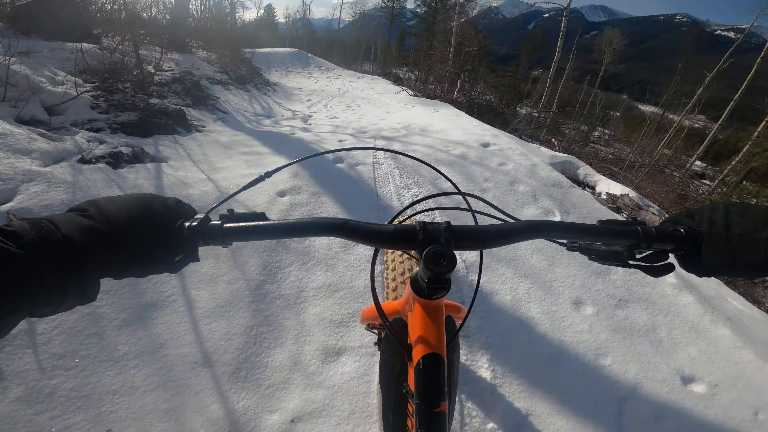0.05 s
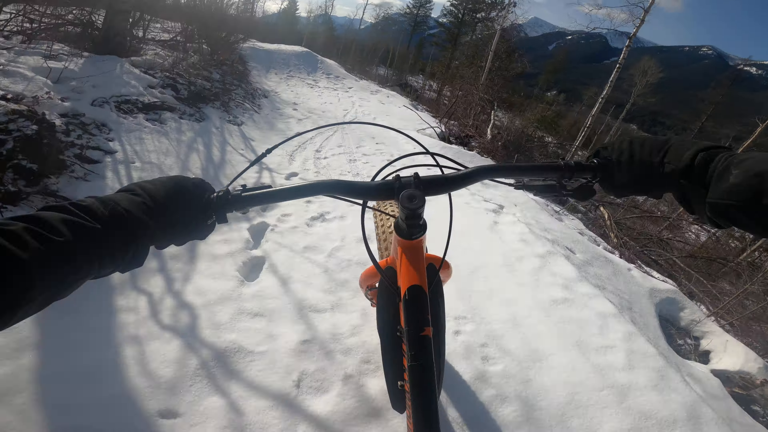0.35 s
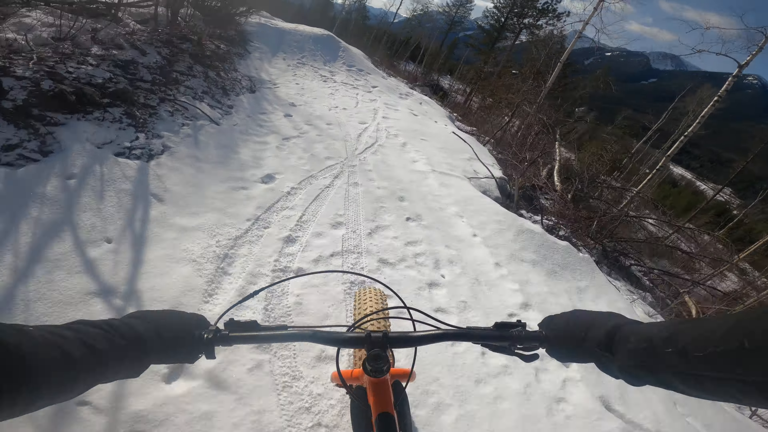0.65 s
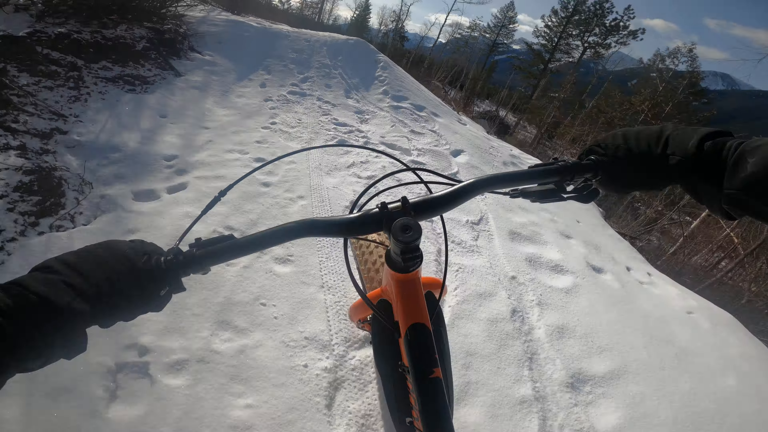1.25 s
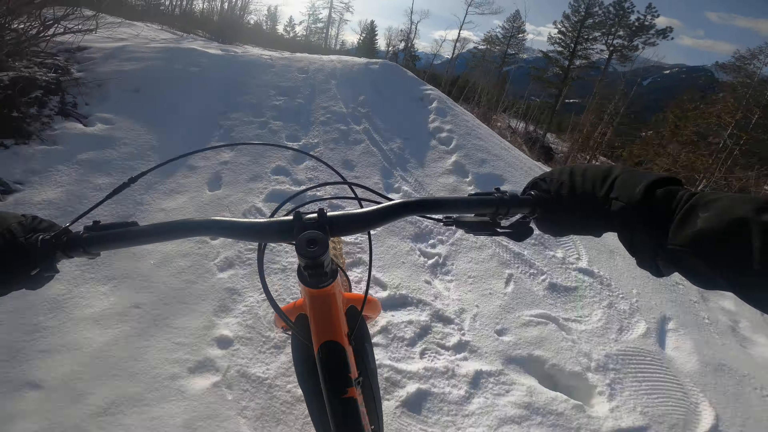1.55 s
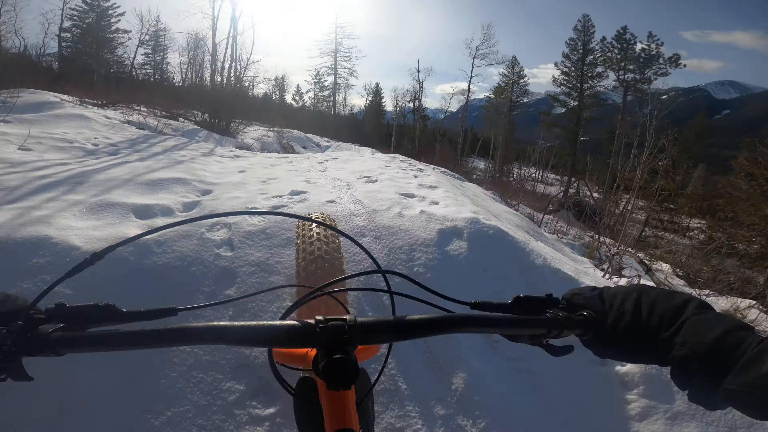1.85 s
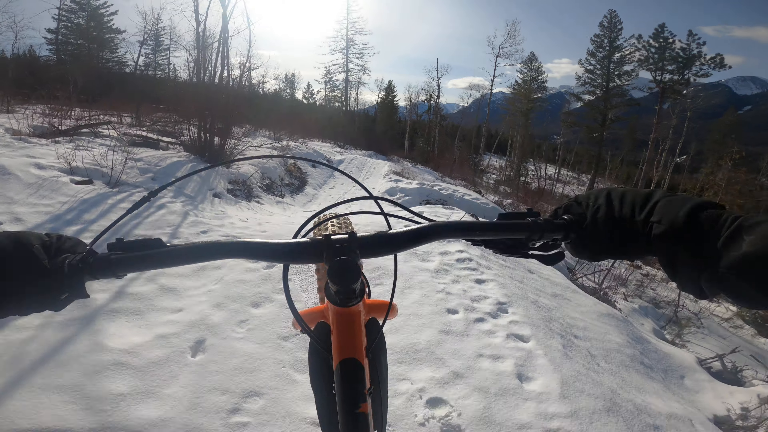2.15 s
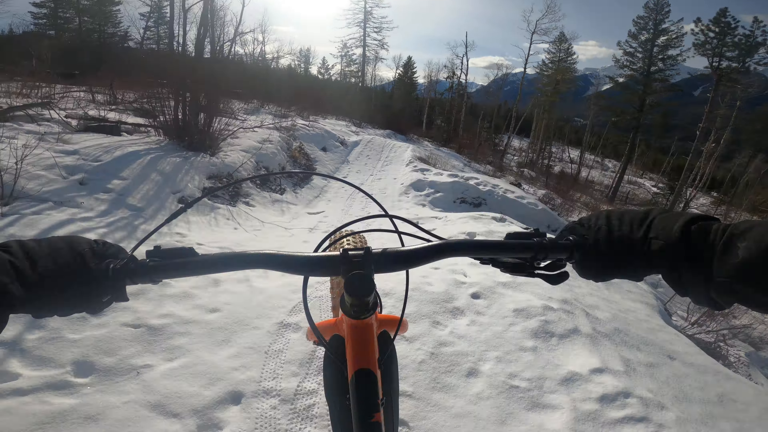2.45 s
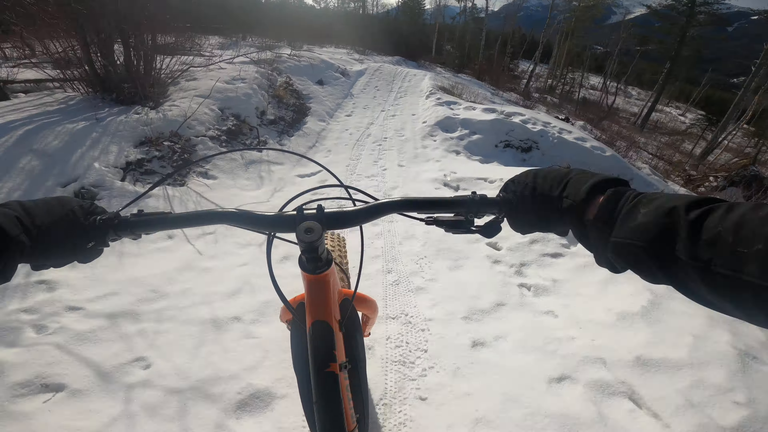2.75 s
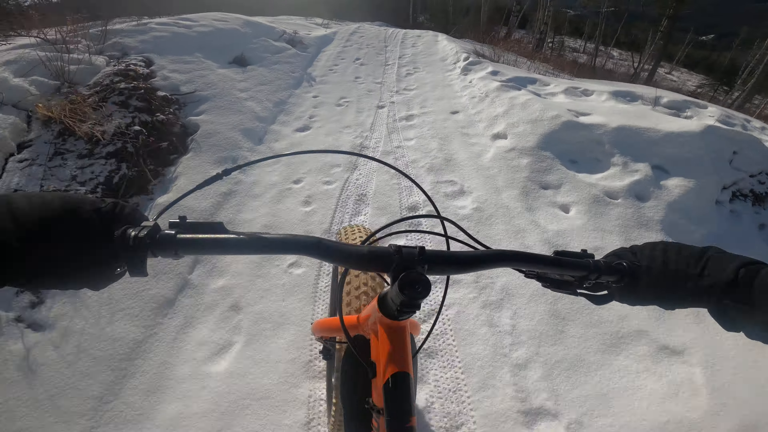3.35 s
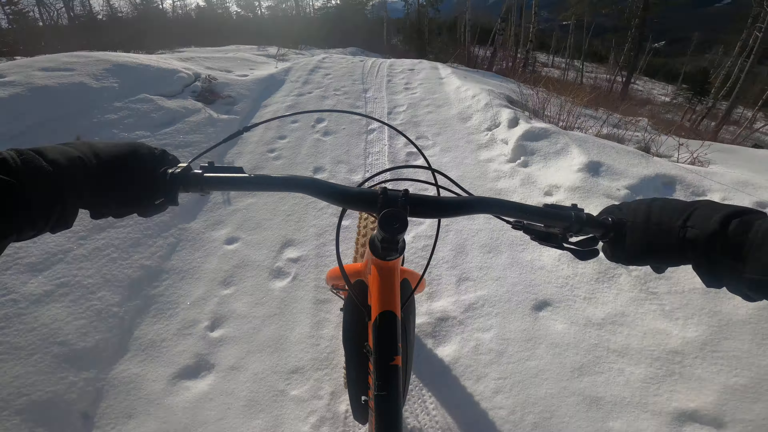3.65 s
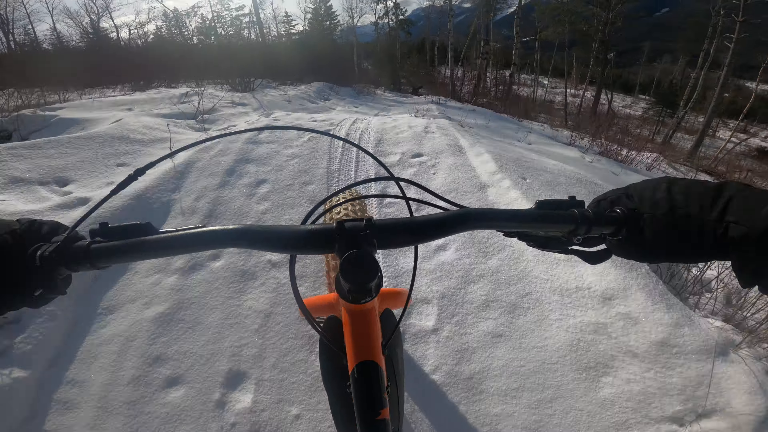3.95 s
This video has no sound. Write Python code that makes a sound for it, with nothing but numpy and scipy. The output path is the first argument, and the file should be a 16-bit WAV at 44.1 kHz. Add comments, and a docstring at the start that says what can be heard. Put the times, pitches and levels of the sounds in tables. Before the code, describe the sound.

Mountain bike tyres drum and crunch over packed snow while wind buffets the rider's chest microphone. The tyres briefly go quiet twice, the second time leaving a ticking freewheel, before a thudding landing, chain rattle and more bumpy rolling.

```python
"""Knobby mountain bike tyres coast over packed snow, heard from the rider's chest. The tread drums
through the frame, crunches the crust and squeaks as it slips. The tyres go quiet over a roller and
again in a jump, where the ticking freewheel comes through. Both wheels land with a thud that jolts
the microphone, the chain slaps the frame, and a headwind buffets throughout."""
import sys
import numpy as np
from scipy.fft import rfft, irfft, next_fast_len
from scipy.io import wavfile
from scipy.ndimage import uniform_filter1d, map_coordinates

SR = 44100
rng = np.random.default_rng(int(sys.argv[2]) if len(sys.argv) > 2 else 0)


def file_out(sig):
    """Save sig as 16-bit WAV at sys.argv[1]."""
    # one column per channel
    cols = np.atleast_2d(sig).T
    # limit, then scale
    lim = np.clip(cols, -1, 1)
    pcm = np.round(lim * 32767).astype(np.int16)
    wavfile.write(sys.argv[1], SR, pcm)


N = 176400


def amp(db):
    """Decibels to gain."""
    return 10 ** (np.asarray(db) / 20)


def unit(x):
    """Scale to rms 1."""
    return x / np.sqrt(np.mean(x ** 2) + 1e-20)


def curve(rows):
    """An automation line through (seconds, value) points, one value per sample."""
    return np.interp(np.arange(N) / SR, *np.transpose(rows))


def wobble(per_s):
    """A smooth random curve through per_s points a second."""
    return map_coordinates(rng.standard_normal(4096), [np.arange(N) * per_s / SR], mode="wrap")


def coloured(x, eq):
    """Shape x with a causal, unit-power EQ drawn through (Hz, dB) points."""
    size = next_fast_len(N + SR // 4, True) // 2 * 2
    hz, db = np.transpose(eq)
    gain = amp(np.interp(np.log(np.fft.rfftfreq(size, 1 / SR) + 1), np.log(hz), db))
    # Minimum phase, so nothing rings ahead of a hit.
    cepstrum = irfft(np.log(unit(gain)), size)
    cepstrum[1:size // 2] *= 2
    cepstrum[size // 2 + 1:] = 0
    return irfft(rfft(x, size) * np.exp(rfft(cepstrum)), size)[:N]


def contacts(per_s, spread_db):
    """Randomly timed impulses of scattered size, rms 1."""
    impulses = (rng.random(N) < per_s / SR) * rng.choice([-1, 1], N)
    return unit(impulses * amp(spread_db * rng.standard_normal(N)))


def steady(x, samples):
    """Level out the chance swells of a noise over a window of samples."""
    power = uniform_filter1d(uniform_filter1d(x ** 2, samples), samples)
    return x / np.sqrt(np.abs(power) + 1e-12)


def add(track, start, sound):
    """Mix a sound into the track at start seconds."""
    part = track[max(0, round(start * SR)):][:len(sound)]
    part += sound[:len(part)]


# The fader for drum and crunch together. Each row: time in seconds, level in dB.
ROLL_LEVEL = [(0, -24.5), (.34, -23.5), (.42, -26.5), (.45, -33), (.77, -45.5), (.795, -27.5), (.93, -27),
              (1.0, -29), (1.11, -23.5), (1.42, -28), (1.48, -25), (1.55, -28.5), (1.6, -26), (1.87, -20),
              (2.03, -24.5), (2.12, -37.5), (2.17, -30), (2.24, -41.5), (2.595, -54), (2.64, -27.5),
              (2.72, -20.5), (2.82, -28.5), (3.0, -34), (3.3, -30.5), (3.43, -24), (3.62, -23), (3.72, -29),
              (4, -27)]
# How crisp the snow is. Each row: time in seconds, crunch trim in dB.
CRISPNESS = [(.3, -13), (.95, -8), (1.4, -12), (1.85, -13), (2.2, -11.5), (3.8, -14.5)]
# The hollow body of casing and frame. Each row: frequency in Hz, gain in dB.
DRUM_EQ = [(40, -17.5), (120, -10), (200, -11.5), (270, 1), (320, 0.5), (400, -2.5), (600, -7.5),
           (800, -12), (1200, -14), (1550, -22.5), (2500, -33), (15000, -105)]
# The midrange bite of breaking snow crystals. Each row: frequency in Hz, gain in dB.
CRUNCH_EQ = [(300, -13.5), (900, 6), (1500, 3.5), (2200, 1.5), (2650, -1), (3300, -2), (4200, -8.5),
             (5600, -12), (7500, -22.5), (11800, -35), (15000, -63)]

def tyres():
    """Tread blocks drum on the casing and frame while snow crystals break; bumps shake both."""
    bumps_db = 1.4 * wobble(70)
    drum = steady(coloured(contacts(per_s=1600, spread_db=1), DRUM_EQ), samples=1000)
    crunch = unit(coloured(contacts(per_s=5400, spread_db=2.5), CRUNCH_EQ))
    crunch_db = curve(CRISPNESS) + .99 * wobble(120)
    return amp(curve(ROLL_LEVEL) + bumps_db) * (amp(1) * drum + amp(crunch_db) * crunch)


# Wheels hitting the ground, a rut or a footprint. Each row: start in seconds, strength in dB.
THUDS = [(0.778, -36), (0.883, -20.5), (1.122, -23), (1.248, -24), (1.305, -17.5), (1.375, -20),
         (1.475, -21), (1.606, -16.5), (1.733, -20.5), (1.87, -24), (2.604, -13), (2.664, -12),
         (2.755, -20), (2.838, -21.5), (2.92, -20.5), (3.169, -25.5), (3.227, -20.5), (3.407, -17),
         (3.51, -18.5), (3.631, -19.5), (3.913, -21)]
# The boxy knock of the bike. Each row: frequency in Hz, gain in dB.
THUD_EQ = [(40, 0.5), (150, -12), (320, 9), (480, 3.5), (700, -1.5), (1000, -9), (1300, -7.5), (1700, -16),
           (3000, -23), (6000, -39.5), (14000, -64.5)]

def wheel_thuds(attack_s=.004, t60=.1, kick_db=14, crumble_db=3):
    """A wheel slams into the snow: one kick, then a burst of collapsing crust, through the bike."""
    envelope, kicks = np.zeros((2, N))
    t = np.arange(SR // 4) / SR
    for start, db in THUDS:
        add(envelope, start, amp(db - 60 * t / t60) * (1 - np.exp(-t / attack_s)))
        kicks[round(start * SR)] = amp(db + kick_db)
    crumble = steady(coloured(contacts(per_s=4000, spread_db=2), THUD_EQ), samples=300)
    return amp(crumble_db) * envelope * crumble + coloured(kicks, THUD_EQ)


# Rubber chirps. Each row: start in seconds, length in seconds, level in dB, pitch in Hz.
SQUEAKS = [(1.1, .075, -36, 2170), (1.335, .035, -38, 2150), (1.368, .02, -29, 2250)]

def squeaks(slips_per_s=900, roughness=.055):
    """The tread slips on the snow in brief, hoarse squeaks."""
    out, t = np.zeros(N), np.arange(N) / SR
    for start, length, db, hz in SQUEAKS:
        cycles = np.cumsum(hz * (1 + roughness * wobble(slips_per_s))) / SR
        progress = np.clip((t - start) / length, 0, 1)
        swell = np.sqrt(np.abs(np.sin(np.pi * progress)))
        out += swell * amp(db + 2 * wobble(slips_per_s / 2)) * np.sin(2 * np.pi * cycles)
    return out


# The fader for the buffeting. Each row: time in seconds, level in dB before the boost.
BUFFET_LEVEL = [(0, -26), (.42, -20.5), (.78, -24), (1.02, -26), (1.2, -22), (1.6, -26), (2.03, -25),
                (2.17, -35), (2.32, -35), (2.45, -27), (2.62, -31), (2.69, -27.5), (2.92, -31),
                (3.1, -28.5), (3.26, -34.5), (3.43, -26.5), (3.78, -25), (4, -30.5)]
# The low rumble of wind on the microphone. Each row: frequency in Hz, gain in dB.
BUFFET_EQ = [(20, 0), (60, 0), (170, -4.5), (240, -10), (400, -16.5), (800, -34.5), (2000, -51),
             (15000, -115)]

def headwind(boost_db=3):
    """Wind buffets the microphone with a broad rumble."""
    rumble = steady(coloured(rng.standard_normal(N), BUFFET_EQ), samples=3000)
    return amp(curve(BUFFET_LEVEL) + boost_db) * rumble


# Deep flutters on the microphone: wind gusts, plus the low jolt of the landing at 2.655 s.
# Each row: start in seconds, length in seconds, level in dB, pitch in Hz.
FLUTTERS = [(0.429, .29, -19.5, 98), (1.2, 0.27, -19, 66), (2.406, 0.21, -18.5, 52.3),
            (2.655, 0.059, -18, 44.8), (3.676, 0.104, -14, 50)]

def deep_flutters(pitch_spread=.146, fade_s=.025):
    """Eddies in the wind, and once the landing, shake the microphone with a low, wavering tone."""
    out, t = np.zeros(N), np.arange(N) / SR
    for start, length, db, hz in FLUTTERS:
        cycles = np.cumsum(hz * (1 + pitch_spread * wobble(hz))) / SR
        swell = np.clip(np.minimum(t - start, start + length - t) / fade_s, 0, 1)
        out += swell * amp(db + 2 * wobble(36)) * np.sin(2 * np.pi * cycles)
    return out


# The bright snap of bare metal contact. Each row: frequency in Hz, gain in dB.
CLICK_EQ = [(500, -12), (2000, -8), (3500, 7), (6000, 4.5), (8500, -8), (12000, -19.5), (15000, -26)]

def struck_metal(hits, modes, t60, attack_s, click_db, click_t60, ring_growth=0):
    """Each (seconds, dB) hit clicks and rings a little differently; ring_growth dulls soft hits."""
    ring, click = np.zeros((2, N))
    t = np.arange(SR // 12) / SR
    hz, mode_db = np.transpose(modes)[:, :, None]
    attack = 1 - np.exp(-t / attack_s)
    hardest_db = max(db for _, db in hits)
    for start, db in hits:
        scatter, detune, phase = rng.standard_normal((3, len(modes), 1))
        decays = amp(mode_db + 2.5 * scatter - 60 * t / t60)
        partials = decays * np.sin(2 * np.pi * (hz * (1 + .016 * detune) * t + phase))
        add(ring, start, amp(db + ring_growth * (db - hardest_db)) * attack * partials.sum(0))
        burst = attack * rng.standard_normal(len(t))
        add(click, start, amp(db + click_db - 60 * t / click_t60) * burst)
    return ring + coloured(click, CLICK_EQ)


# The pace of the coasting hub. Each row: time in seconds, ticks per second.
TICK_RATE = [(0, 48), (.6, 61), (.8, 72), (2.0, 42), (2.1, 44), (2.14, 37.5), (2.26, 35.7), (2.38, 39.5),
             (2.42, 50), (2.55, 59), (2.85, 36), (3.8, 56)]
# How hard the pawls drop. Each row: time in seconds, strength in dB.
TICK_STRENGTH = [(0, -36.5), (.55, -45), (2.08, -41), (2.14, -50), (2.24, -42), (2.44, -34.5), (2.55, -39),
                 (2.85, -31.5), (3.1, -55), (3.8, -43.5)]
# The thin ring of the hub. Each row: frequency in Hz, relative level in dB.
HUB_MODES = [(4120, -7.5), (4700, -11), (5620, -7), (9350, -19), (9870, -21)]

def freewheel(anchor_s=2.2245):
    """Pawls drop over each tooth of the rear hub; one tick is at anchor_s, the pace sets the rest."""
    teeth = np.cumsum(curve(TICK_RATE)) / SR
    drops = np.flatnonzero(np.diff(np.floor(teeth - teeth[round(anchor_s * SR)])))
    tick_db = curve(TICK_STRENGTH)[drops] + 1.6 * rng.standard_normal(len(drops))
    ticks = list(zip(drops / SR, tick_db))
    return struck_metal(ticks, HUB_MODES, t60=.03, attack_s=.0026, click_db=-3, click_t60=.032)


# Chain and cable slaps. Each row: start in seconds, strength in dB.
SLAPS = [(.228, -35), (.961, -35), (2.714, -26.5), (2.739, -23.5), (2.862, -34), (2.985, -35.5),
         (3.246, -32), (3.48, -33.5), (3.69, -36)]
# The clink of the chain. Each row: frequency in Hz, relative level in dB.
CHAIN_MODES = [(2724, -6), (3208, -5), (3505, 2), (3801, -3), (4883, -8), (6304, -10)]

def chain():
    """The chain and cables slap the frame over bumps; the hardest slaps ring most."""
    return struck_metal(SLAPS, CHAIN_MODES, t60=.036, attack_s=.0005,
                        click_db=-1, click_t60=.024, ring_growth=.45)


# The soft rush of air around the tread. Each row: frequency in Hz, gain in dB.
AIR_EQ = [(60, -18), (300, 4), (900, -1), (1900, 1), (3000, -5), (5500, -15.5), (7500, -23), (11000, -31),
          (15000, -54)]

def tread_air(level_db=-46):
    """The spinning tread stirs the air into a faint, nearly even bed of hiss."""
    return amp(level_db + .38 * wobble(23)) * unit(coloured(rng.standard_normal(N), AIR_EQ))


def scene():
    """A dry mono mix: everything is close to the microphone, in open air."""
    ground = tyres() + squeaks() + wheel_thuds()
    return (ground + headwind() + deep_flutters() + tread_air() + freewheel() + chain())[None]


def record(dry, cutoff_hz=15300):
    """A brick-wall low-pass takes off the very top."""
    size = next_fast_len(N + SR // 2)
    passband = np.fft.rfftfreq(size, 1 / SR) < cutoff_hz
    return irfft(rfft(dry, size) * passband, size)[:, :N]


dry = scene()
out = record(dry)
file_out(out)
```